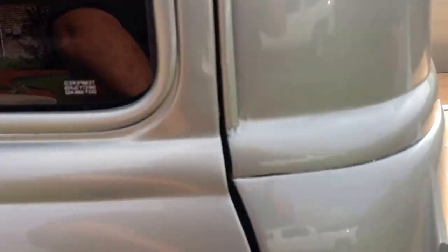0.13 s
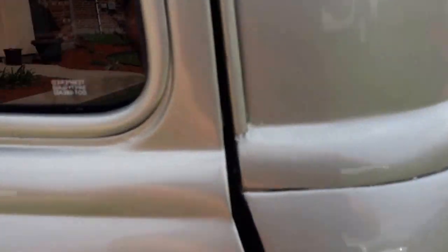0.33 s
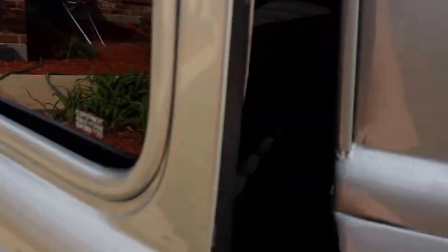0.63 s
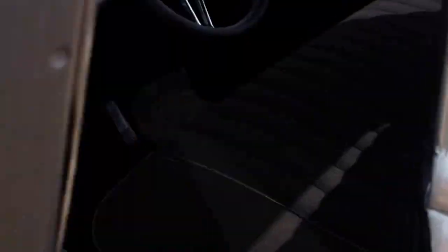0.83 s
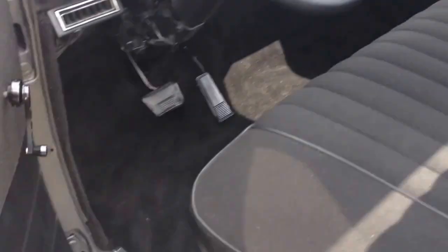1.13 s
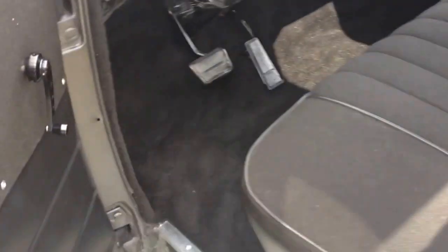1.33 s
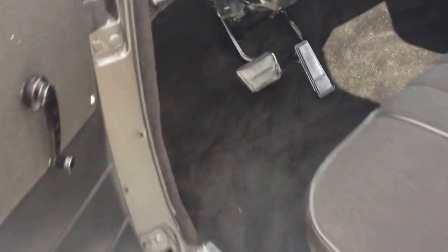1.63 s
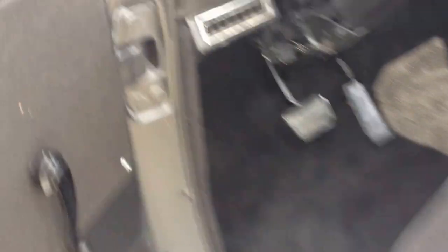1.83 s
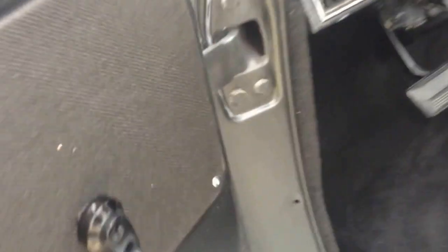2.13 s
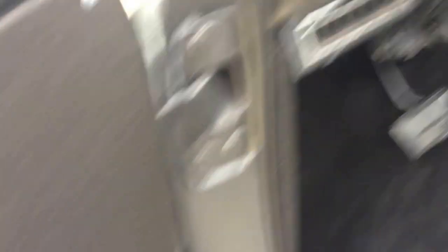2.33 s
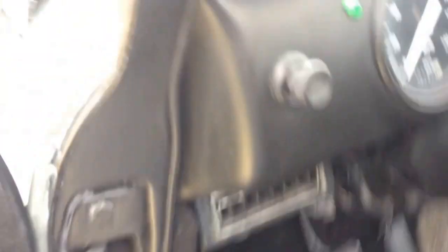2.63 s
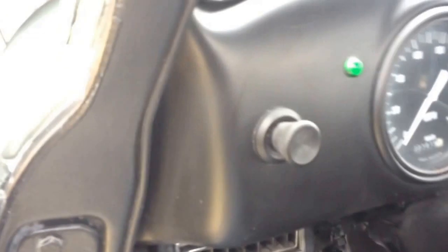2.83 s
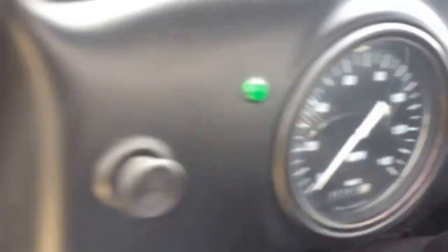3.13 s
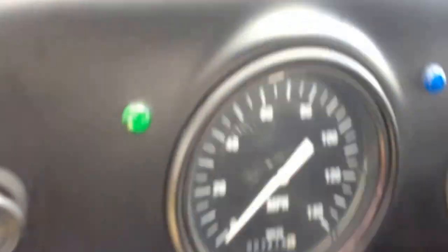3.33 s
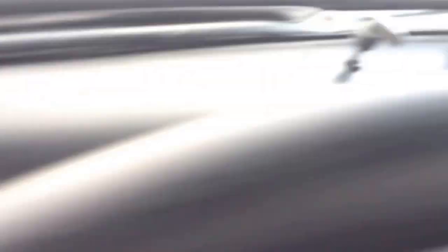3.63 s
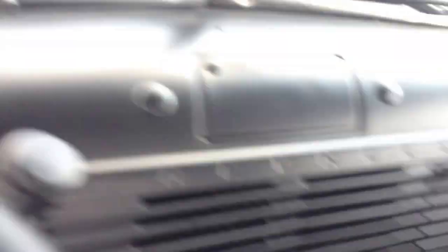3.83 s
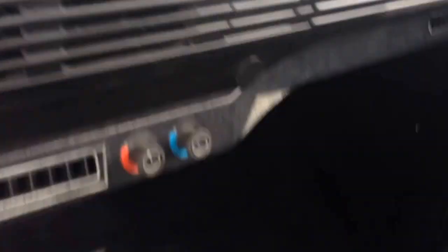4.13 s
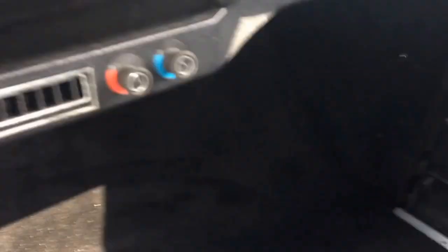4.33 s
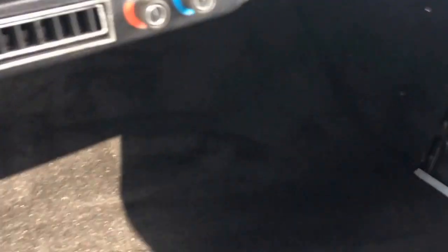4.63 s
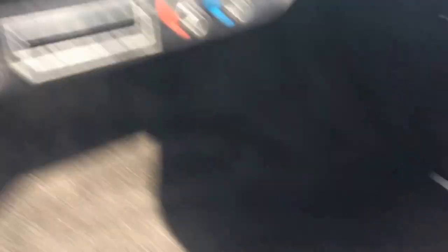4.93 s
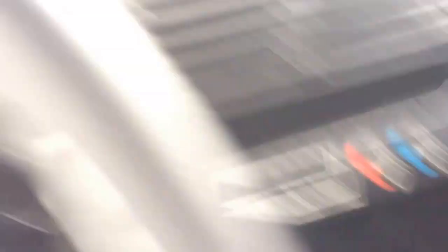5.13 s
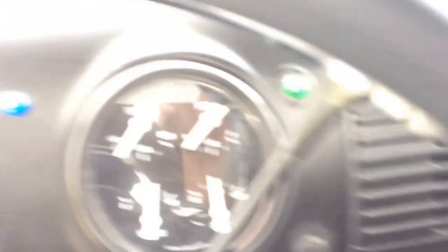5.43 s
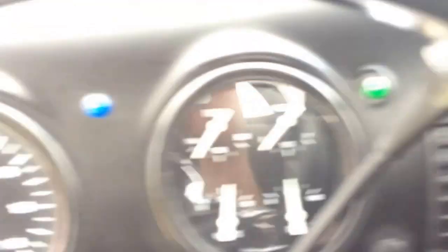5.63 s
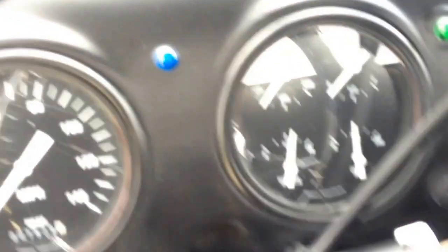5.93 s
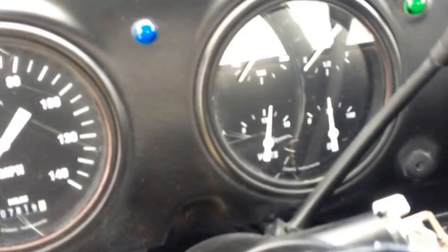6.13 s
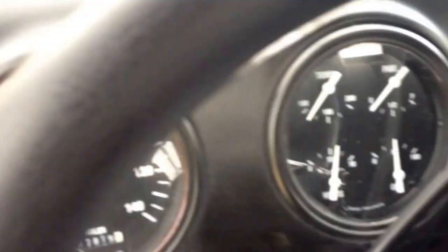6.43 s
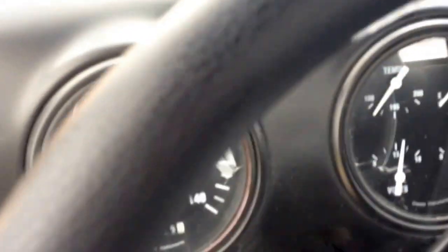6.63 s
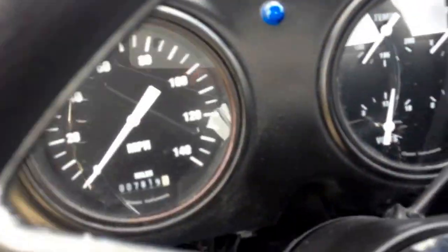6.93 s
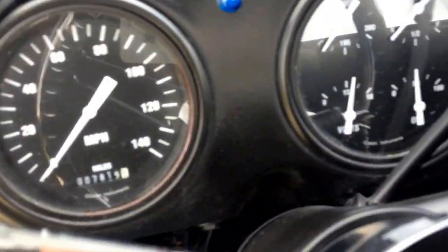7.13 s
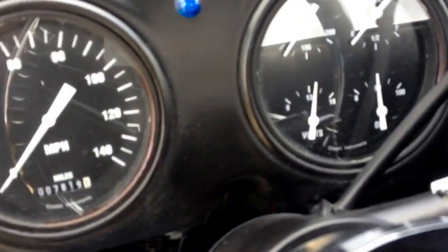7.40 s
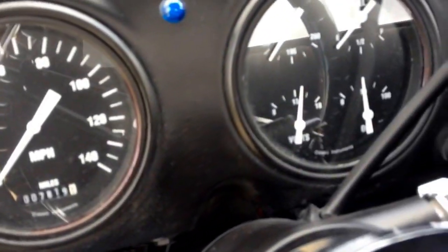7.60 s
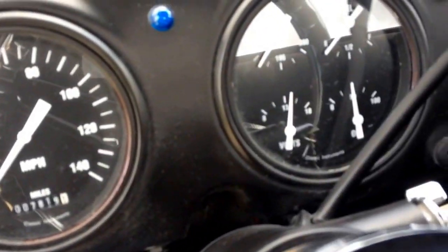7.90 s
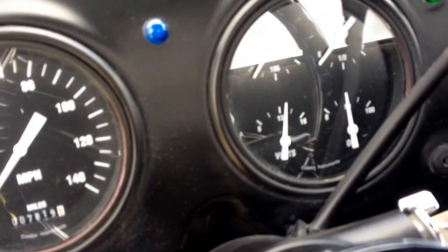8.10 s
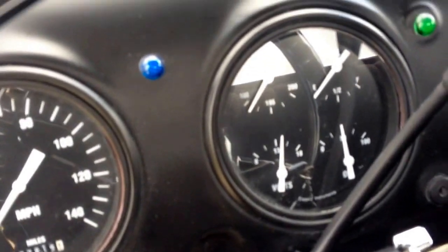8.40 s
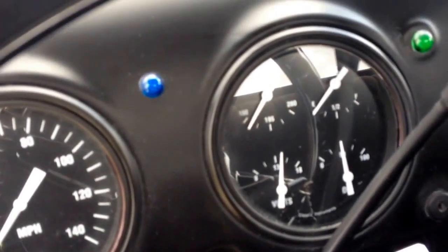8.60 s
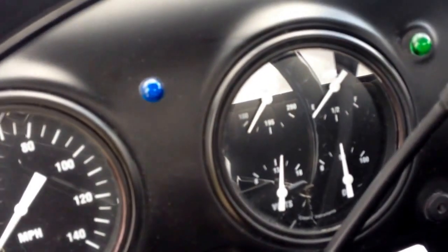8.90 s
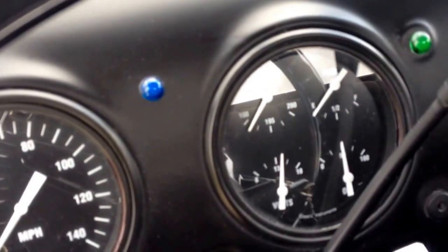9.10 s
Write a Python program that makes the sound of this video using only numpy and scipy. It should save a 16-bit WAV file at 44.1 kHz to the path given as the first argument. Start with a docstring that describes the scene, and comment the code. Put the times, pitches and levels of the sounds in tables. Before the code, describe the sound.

An old pickup's V8 idles throughout, about 54 uneven firings a second, throbbing with a slow lope over low rumble. Valve ticks, clatter near 1 kHz, fan rush, hiss and a faint wavering whine come from the engine bay. From 0.13 to 0.34 s the door latch drags, slips and lets go in a dense cluster of knocks, loudest and sharpest around 0.27 s. Softer, dull door bumps follow at 0.77, 1.26 and 1.44 s. Bay noise is most open near 1.8 s, then recedes as the microphone enters the cab; the exhaust resonance thins under the dash around 4 to 5 s, then returns. A hard double clack with bounces comes at 3.2 s, faint ticks at 3.7-4.3 and 5.5-6.0 s. Steady idle holds until 7.9 s, when revs climb, bark near 8.5 s, and surge after 9 s with one hard knock, ending high at about 9.3 s.

```python
"""First heard is the uneven idle of an old pickup's V8: eight exhaust pulses a cycle ring pipes and cab.
Valve gear ticks and clatters in step from the engine bay, over a rush, a hiss and a faint, varying whine.
The latch drags, slips and thumps as the door opens; the microphone goes round it into the cab.
There, struck modes give a sharp clack and small ticks. At the end the engine is revved:
its firing rate climbs, cab modes and higher engine orders sing out, and a low rumble lies under all."""
import sys
import numpy as np
from scipy import signal
from scipy.fft import rfft, irfft, next_fast_len
from scipy.io import wavfile
from scipy.ndimage import uniform_filter1d, map_coordinates

SR = 44100
rng = np.random.default_rng(int(sys.argv[2]) if len(sys.argv) > 2 else 0)


def wrap_up_sound(samples):
    """Save the sound to the file named by the first command line argument, as 16-bit audio."""
    columns = np.atleast_2d(samples).T
    # keep every value between -1 and 1, then stretch to whole-number steps
    tamed = np.clip(columns, -1, 1)
    steps = np.round(tamed * 32767).astype(np.int16)
    wavfile.write(sys.argv[1], SR, steps)


N = 408366
TIME = np.arange(N) / SR  # [s]

# Engine speed, a wandering idle and then the rev. Each row: time in [s], firing rate in [firings per s].
SPEED = [(0.0, 53.87), (0.8, 53.98), (1.2, 55.12), (1.6, 54.26), (2.8, 54.36), (3.2, 53.44), (4.4, 54.29),
         (4.8, 53.74), (5.6, 54.5), (6.0, 52.96), (6.4, 54.05), (7.2, 54.52), (7.93, 53.7), (8.3, 76.6),
         (8.5, 89.7), (8.65, 95.6), (8.88, 100.2), (9.0, 115.3), (9.1, 131), (9.17, 138.5), (9.26, 140)]
# The pedal eased down, blipped and let go. Each row: time in [s], throttle as a [share 0-1].
THROTTLE = [(7.9, 0), (8.25, 0.13), (8.55, 0.19), (8.7, 0.31), (8.87, 0.47), (9.02, 0.95), (9.14, 0.83),
            (9.26, 0.3)]
# How open the microphone lies to the engine bay, as it goes round the door into the cab.
# Each row: time in [s], openness as a [share 0-1].
OPENNESS = [(0.04, 0.83), (.55, 0.59), (1.05, 0.85), (1.75, 0.98), (2.6, 0.41), (3.2, 0.56), (4.0, 0.16),
            (7.9, 0.16)]
# Strength of the cab's standing waves at the microphone, weakest under the dash; layers take a share of it.
# Each row: time in [s], strength in [dB].
CAB_RING = [(.7, -1.5), (2.8, 2.5), (3.55, 1.5), (4.05, -11), (4.5, -13), (4.95, -11.5), (5.35, -4),
            (6.35, 0.5), (7.8, -1.5)]

# One engine cycle at the tailpipes. Each row: arrival in [firing intervals], relative strength in [dB].
CYLINDERS = [(-0.13, -3), (0.68, 0.6), (1.73, -2.4), (2.84, -0.4), (3.66, 2.4), (4.85, 0.2), (5.94, -1.6),
             (6.72, 2)]
# Resonances of pipes and cab. Each row: frequency in [Hz], width in [Hz], relative level in [dB].
PIPE_RESONANCES = [(150.3, 13.6, 4.5), (189.4, 17, -1), (247.85, 15.3, 8.5), (282.6, 17, 5.5)]
# Upper pipe resonances. Each row: frequency in [Hz], width in [Hz], relative level in [dB].
UPPER_PIPE_RESONANCES = [(410.3, 11.4, 11), (471.2, 5.1, 11), (520.3, 26, 4.5)]
# Gas puffs in each cycle. Each row: place in [firing intervals], relative strength in [dB].
PUFFS = [(1.3, 2), (2.1, -4.5), (3.2, -6), (4.0, 0), (4.721, 1), (6.8, -6)]
# Engine orders that sing out in the rev. Each row: [multiple of the firing rate], relative level in [dB].
REV_ORDERS = [(2.375, -2), (2.75, 0), (3.625, -3), (4.25, -4), (4.75, -6), (5.75, -9)]
# Colour of the gas rasp. Each row: frequency in [Hz], relative density in [dB per Hz].
RASP_COLOUR = [(280, -7.5), (340, -6.5), (400, 4.5), (430, -14), (480, -1), (535, -9.5), (600, -43),
               (680, -28), (740, -9.5), (880, -38), (1200, -31.5)]
# The cab booms when the firing rate crosses its lowest mode
BOOM_HZ, BOOM_WIDTH_HZ = 64.8, 4.55
# The pipes bark louder in a narrow range of speed (firings per s)
BARK_FIRING_HZ, BARK_WIDTH_HZ, BARK_SWELL_DB = 89, 5.2, 9.5
# The cab's two strongest modes
DRONE_HZ, DRONE_RING_WIDTH_HZ = 175.6, 47
BARK_HZ, BARK_RING_WIDTH_HZ = 266.3, 15
# The idle lopes, one heavy beat a cycle: its place in firing intervals, and the swing at idle
LOPE_PLACE, LOPE_DB = 4.9, 2.1

# Knocks in each engine cycle. Each row: place in [firing intervals], relative strength in [dB].
KNOCKS = [(1.65, -2), (2.3, -7.5), (3.7, -0.5)]
# The bay knock comes and goes. Each row: time in [s], level in [dB over the clatter, before its blurring].
KNOCK_LEVEL = [(1.95, 2), (2.4, -2), (3.1, -7), (4.0, -7), (4.45, 3), (5.2, 2), (5.7, -2), (7.0, 0.5)]
# Valve ticks in each cycle. Each row: place in [firing intervals], relative strength in [dB], ring in [Hz].
VALVES = [(.45, 0.5, 2420), (1.0, 5, 6970), (2.03, 3.5, 4550), (4.0, 2.5, 6230), (7.0, 2.5, 7850)]
# Resonances of the rocker covers. Each row: frequency in [Hz], width in [Hz], relative level in [dB].
ROCKER_RESONANCES = [(1876, 140, 4), (2290, 120, -5), (3010, 87, -2.5)]
# The rocker covers rattle in patches. Each row: time in [s], change of level in [dB].
ROCKER_LEVEL = [(1.5, 6), (1.88, 5), (2.15, -3), (5.4, -0.5), (5.9, 5), (6.6, 3), (7.0, -2)]
# The whine's course. Each row: time in [s], level in [dB, before a small trim and drift].
WHINE_LEVEL = [(1.3, -61), (1.8, -43), (2.05, -53), (2.5, -42), (2.7, -51), (3.6, -51), (3.85, -47),
               (4.25, -65), (4.55, -45.5), (7.2, -49), (8.4, -43)]
# Colour of the clatter. Each row: frequency in [Hz], relative density in [dB per Hz].
CLATTER_COLOUR = [(700, 1.5), (900, -2), (980, 3), (1040, 9.5), (1090, 5), (1170, 4), (1300, -7.5),
                  (1700, -16.5)]
# Colour of the fan's rush. Each row: frequency in [Hz], relative density in [dB per Hz].
RUSH_COLOUR = [(700, 7.5), (1250, 3), (1450, 6.5), (1650, 2), (1950, 4), (2500, 1), (3400, -3.5),
               (4850, -4), (5200, -15.5), (8000, -40)]
# Colour of bay and intake hiss. Each row: frequency in [Hz], relative density in [dB per Hz].
HISS_COLOUR = [(3500, 4), (5100, 1), (5600, 1.5), (7000, 0), (8500, -2), (9900, -1), (11500, -1.5),
               (13000, -2), (15500, -5.5)]
# Colour of the valve ticks. Each row: frequency in [Hz], relative density in [dB per Hz].
TICK_COLOUR = [(1500, -21), (4700, -2.5), (8500, -8.5), (12000, 0), (15500, -6.5)]
# One hard knock in the rev, and what it rings. Each row: frequency in [Hz], relative level in [dB], t60 in [s].
COVER_MODES = [(1005, -3, .05), (1070, 4, 0.071)]
HARD_KNOCK_S, HARD_KNOCK_DB = 9.064, -14.5

# Slips and blows on latch and door. Each row: time in [s], peak in [dB], brightness (low-pass) in [Hz].
DOOR_BLOWS = [(0.126, -11, 550), (0.154, -18, 700), (0.172, -11, 900), (0.189, -15, 1390), (0.2, -7.5, 700),
              (0.212, -10, 1000), (0.226, -17, 500), (0.2395, -3.5, 1250), (0.255, -10, 2000),
              (0.264, -9, 1800), (0.2696, 0.5, 4600), (0.2719, -1.5, 330), (.279, -5, 3000),
              (0.2817, -6, 5000), (0.2882, -4, 2800), (0.304, -19, 1600), (0.336, -11, 1500),
              (0.764, -20, 600), (0.784, -17, 1000), (1.238, -19, 700), (1.254, -13.5, 900),
              (1.258, -13.5, 1100), (1.265, -14, 1500), (1.269, -4.5, 550), (1.426, -17, 800),
              (1.442, -13, 650), (1.458, -19, 1200)]
# Modes of the door panel. Each row: frequency in [Hz], relative level in [dB], t60 in [s].
DOOR_MODES = [(165, 3, 0.064), (246, 3.5, 0.044), (345, 0.5, 0.034), (534, 2.5, 0.023), (710, -6, 0.042),
              (1045, -2.5, 0.02), (1280, -12, 0.06), (1540, -13, 0.038), (1780, -12, 0.033),
              (2180, 1.5, 0.0072), (2680, -8, 0.013), (3400, -6, 0.0039)]
# The latch drags until it lets go, later the door scuffs as it swings.
# Each row: start in [s], end in [s], level at the end in [dB].
DRAGS = [(0.126, 0.268, -20.5), (0.743, 0.797, -37), (1.233, 1.279, -35), (1.402, 1.457, -37)]
DRAG_RISE_DB_PER_S, DRAG_FALL_DB_PER_S = 75, 330

# The clack, two strikes with bounces between. Each row: time in [s], peak in [dB], ping raised by [dB].
CLACKS = [(3.205, -14.5, 4), (3.209, -13.5, -6), (3.219, -20, -20), (3.226, -17.5, -20), (3.2335, -11, -2)]
# What the clack rings. Each row: frequency in [Hz], relative level in [dB], t60 in [s].
CLACK_MODES = [(400, -8, 0.15), (620, -14, 0.12), (810, -6, 0.11), (1270, -18, 0.072), (2044, 2, 0.062),
               (2310, -1.5, 0.034), (2590, -5, 0.074), (3490, 1, 0.029), (4600, 0, 0.02), (3930, -3, 0.037)]
# Its high ping. Each row: frequency in [Hz], level in [dB, before each strike's change], t60 in [s].
PING_MODES = [(9600, -6, .03), (9800, 10.5, 0.028), (13200, 7, .06)]
# A loose part ticks in short runs. Each row: time in [s], peak in [dB], brightness (low-pass) in [Hz].
RATTLES = [(3.705, -26.5, 2620), (3.7902, -26.5, 7000), (3.868, -28, 6000), (4.1439, -29, 2500),
           (4.2347, -26.5, 7000), (4.252, -27, 5000), (4.312, -30.5, 7000), (5.51, -31.5, 6000),
           (5.778, -25, 2000), (5.8637, -26, 5000), (5.9402, -30, 8000), (5.994, -28.5, 6030),
           (6.017, -27.5, 7000)]
# Ring of the loose part. Each row: frequency in [Hz], relative level in [dB], t60 in [s].
RATTLE_MODES = [(1343, -2, 0.086), (2050, 0, .06), (2830, -1.8, 0.054), (4760, 0, .04), (7480, -1, 0.06),
                (10600, -1, .06), (12550, 2, .05), (13600, 1, .05)]

# Colour of the low rumble. Each row: frequency in [Hz], relative density in [dB per Hz].
RUMBLE_COLOUR = [(20, -24), (40, -13), (100, -0.5), (220, 6), (400, -3), (900, -45)]
CUTOFF_HZ = 15500


def exhaust(firings, per_s, effort):
    """Pulses ring the pipes; their uneven pattern gives a lope at idle and a fan of climbing lines in the rev."""
    pulses = cycle_clicks(firings, CYLINDERS, spread_db=.6, jitter=.004)
    # turbulent gas trails every pulse, more so at speed
    pulses = pulses + swell(pulses, rise_s=.004) * noise() * (.003 + .012 * effort)
    # at speed the climbing orders ring the cab's modes one after another
    sung = np.interp(effort, [.05, .3], [0, .95])
    drone, bark = drone_and_bark(pulses, sung)
    bark = bark * from_db(BARK_SWELL_DB * np.exp(-((per_s - BARK_FIRING_HZ) / BARK_WIDTH_HZ) ** 2))
    lope_db = LOPE_DB * (1 - sung) * np.cos(2 * np.pi * (firings - LOPE_PLACE) / 8)
    bark = bark * from_db(lope_db + .9 * drift(12))
    boom = np.sin(2 * np.pi * firings) * from_db(0.87 * drift(10))
    boom = boom / np.hypot(1, 2 * (per_s - BOOM_HZ) / BOOM_WIDTH_HZ)
    rasp = gas_rasp(firings, effort)
    climbing = rev_orders(firings)
    return (climbing * level(effort, idle_db=-55, speed_db=28, throttle_db=12)
            + boom * level(effort, idle_db=-24.0, open_db=-12.0, ring=-.08, throttle_db=-2)
            + drone * level(effort, idle_db=-28, ring=0.63, speed_db=9.5, throttle_db=13)
            + bark * level(effort, idle_db=-23.5, ring=1, speed_db=-4.0, throttle_db=18)
            + rasp * level(effort, idle_db=-37.0, open_db=-4, ring=0.34, speed_db=13.0, throttle_db=4.5))


def drone_and_bark(pulses, sung):
    """Pipe resonances split at 222 Hz, as the two parts fade differently; in the rev each rings a cab mode."""
    pipes = cut(resonances(pulses, PIPE_RESONANCES), 95, "high", order=4)
    drone, bark = pipes, pipes
    for _ in range(2):
        drone = cut(drone, 222, "low", order=4)
        bark = cut(bark, 222, "high", order=4)
    bark = evened(cut(bark, 363, "low", order=3))
    bark_ring = evened(resonate(bark, BARK_HZ, BARK_RING_WIDTH_HZ))
    bark = evened((1 - sung) * bark + sung * bark_ring)
    drone_ring = resonate(drone, DRONE_HZ, DRONE_RING_WIDTH_HZ)
    drone_ring = evened(resonate(drone_ring, DRONE_HZ, DRONE_RING_WIDTH_HZ))
    drone = evened((1 - sung) * evened(drone) + sung * drone_ring)
    return drone, bark


def gas_rasp(firings, effort):
    """Bursts of gas puff and ring the upper pipe resonances; at speed the ringing takes over."""
    bursts = cycle_clicks(firings, PUFFS, spread_db=1.5, jitter=.004)
    upper = cut(resonances(bursts, UPPER_PIPE_RESONANCES), [330, 620], "band", order=3)
    puffs = .25 + swell(bursts, rise_s=.005)
    ringing = 1.2 + 1.2 * effort
    return evened(ringing * evened(upper) + colour(noise() * puffs, RASP_COLOUR))


def rev_orders(firings):
    """Sines locked to multiples of the firing rate climb with the engine, each drifting in level."""
    orders = [from_db(db + 2 * drift(12)) * np.sin(2 * np.pi * multiple * firings)
              for multiple, db in REV_ORDERS]
    return rms_one(sum(orders))


def engine_bay(firings, effort):
    """Knocks ring a cover near 1 kHz, valves tick over the fan's rush, and an accessory whines."""
    openness, throttle = in_time(OPENNESS), in_time(THROTTLE)
    # knocks and ticks stand out most outside the cab and blur at speed
    distinct = 0.46 + 0.68 * openness - 0.93 * effort
    clatter = knocking_clatter(firings, distinct)
    hard_knock = np.zeros(N)
    add(hard_knock, blow(COVER_MODES, crack=0.28, crack_s=.004, tail=.2, tail_s=.012), HARD_KNOCK_S, HARD_KNOCK_DB)
    ticks, tick_sound = valves(firings)
    rush = colour(noise() * (1 + 0.52 * distinct * ticks), RUSH_COLOUR)
    rush = evened(reflections(rush, strength=0.13))
    rockers = evened(resonances(tick_sound, ROCKER_RESONANCES, alternate=False))
    rockers = rockers * from_db(in_time(ROCKER_LEVEL))
    hiss = evened(colour(noise(), HISS_COLOUR) + 0.78 * distinct * colour(tick_sound, TICK_COLOUR))
    # the cube leaves little intake hiss until the throttle is wide open
    intake = from_db(-36.5) * np.clip(throttle, 0, 1) ** 3 * colour(noise(), HISS_COLOUR)
    return (clatter * level(effort, idle_db=-44.5, open_db=3.0, speed_db=5, throttle_db=11.0)
            + rush * level(effort, idle_db=-45.5, open_db=6.5, ring=0.16, speed_db=6, throttle_db=8.0)
            + rockers * level(effort, idle_db=-60.5, open_db=5.0)
            + hiss * level(effort, idle_db=-52.0, open_db=11.0, ring=0.26, speed_db=-5.0)
            + hard_knock + intake + accessory_whine(effort))


def knocking_clatter(firings, distinct):
    """Broad clatter swells a little with each knock, and a drifting tone near 1 kHz rings as the cover."""
    knocks = swell(cycle_clicks(firings, KNOCKS, spread_db=3, jitter=0.04), rise_s=0.0055)
    cover = tone(1035 + 30 * drift(45)) * evened(knocks)
    clatter = evened(colour(noise() * (14.0 + knocks), CLATTER_COLOUR))
    return clatter + from_db(in_time(KNOCK_LEVEL)) * distinct * cover


def valves(firings):
    """Every valve gives a gritty tick with a ring of its own; returns the ticks' envelope and their sound."""
    envelope, sound = 0, 0
    for place, db, hz in VALVES:
        ticks = swell(cycle_clicks(firings, [(place, db)], spread_db=2.1, jitter=.04), rise_s=.003)
        gritty = noise() * ticks
        envelope = envelope + ticks
        sound = sound + gritty + 3.2 * resonate(gritty, hz, 600)
    return envelope, sound


def accessory_whine(effort):
    """A sine near 785 Hz rises slightly with engine speed and drifts in pitch and level."""
    whine = np.sqrt(2) * tone(785 + 16 * effort + 8 * drift(25))
    return whine * from_db(in_time(WHINE_LEVEL) - .7 + 3 * drift(18))


def door():
    """Latch and door drag ever harder, slip and let go, shaking the panel; soft contacts are duller."""
    drag = 0
    for start, end, db in DRAGS:  # the rise is set by the end alone
        before, after = np.maximum(end - TIME, 0), np.maximum(TIME - end, 0)
        drag = drag + from_db(db - DRAG_RISE_DB_PER_S * before - DRAG_FALL_DB_PER_S * after)
    scrape = cut(cut(grit(N, spread_db=5.5), [150, 700], "band"), 900, "low")
    out = drag * rms_one(scrape)
    for s, peak_db, bright_hz in DOOR_BLOWS:
        add(out, door_blow(bright_hz), s, peak_db)
    return out


def door_blow(bright_hz):
    """One contact on the door's modes, dulled above its brightness."""
    hit = blow(DOOR_MODES, crack=0.098, crack_s=0.0098, tail=0.93, tail_s=0.024)
    return cut(cut(hit, bright_hz, "low", order=3), 118, "high", order=4)


def clacks():
    """Small hard parts knock together in the cab: a double clack with bounces, then lighter ticks."""
    out = np.zeros(N)
    for s, peak_db, ping_db in CLACKS:
        modes = CLACK_MODES + [(hz, db + ping_db, t60) for hz, db, t60 in PING_MODES]
        strike = blow(modes, crack=2.5, crack_s=0.0093, tail=3.9, tail_s=0.046)
        add(out, cut(strike, 3500, "low", order=1), s, peak_db)
    for s, peak_db, bright_hz in RATTLES:
        tick = blow(RATTLE_MODES, crack=3.0, crack_s=0.018, tail=8.0, tail_s=0.037)
        add(out, cut(tick, bright_hz, "low", order=1), s, peak_db)
    return out


def low_rumble(effort):
    """Coloured noise lies under all, louder toward the bay, with speed and with throttle."""
    gain = level(effort, idle_db=-38.5, open_db=6.5, speed_db=7, throttle_db=8.5)
    return gain * colour(noise(), RUMBLE_COLOUR)


def level(effort, idle_db, open_db=0, ring=0, speed_db=0, throttle_db=0):
    """Gain of a layer: its idle level, moved by the microphone's place, the engine's speed and the throttle."""
    place_db = open_db * in_time(OPENNESS) + ring * in_time(CAB_RING)
    return from_db(idle_db + place_db + speed_db * effort + throttle_db * in_time(THROTTLE))


def cycle_clicks(firings, pattern, spread_db, jitter):
    """Repeat a pattern every eight firings, each click a little off in strength and time."""
    place, db = np.transpose(pattern)
    starts = 8 * np.arange(80)[:, None]
    shift, strong = rng.standard_normal((2, len(starts), len(place)))
    at = np.searchsorted(firings, starts + place + jitter * shift)
    heard = (at > 0) & (at < N)
    return np.bincount(at[heard], from_db(db + spread_db * strong)[heard], N)


def swell(clicks, rise_s):
    """Each click of strength 1 becomes a quick swell of height 1 with a slower fall."""
    r = np.exp(-1 / (rise_s * SR))
    return signal.lfilter([np.e / (rise_s * SR)], [1, -2 * r, r * r], clicks + 1e-18)


def blow(modes, crack, crack_s, tail, tail_s):
    """One contact: a gritty crack, every mode with a strength of its own, and a dull tail from the cab."""
    t = TIME[:SR // 4]
    hz, db, t60 = np.transpose(modes)[:, :, None]
    strength = from_db(db + 2 * rng.standard_normal(hz.shape)) * rng.choice([-1, 1], hz.shape)
    rings = strength * np.sin(2 * np.pi * hz * t) * np.exp(-np.log(1000) * t / t60)
    grains = grit(len(t), spread_db=-2.0) * np.exp(-t / crack_s)
    wash = cut(rng.standard_normal(len(t)), [250, 1100], "band") * np.exp(-t / tail_s)
    return rings.sum(0) + crack * grains + tail * wash


def grit(size, spread_db):
    """Noise that comes in grains of very uneven strength, each about half a millisecond long."""
    sample = np.arange(size)
    grains = sample[::SR // 2000]
    strength_db = spread_db * np.clip(rng.standard_normal(len(grains)), -2, 2)
    return rms_one(rng.standard_normal(size) * from_db(np.interp(sample, grains, strength_db)))


def reflections(x, strength):
    """Close metal panels add short echoes, 1 to 12 ms late, that ripple the spectrum."""
    lags = (rng.uniform(.001, .012, size=8) * SR).astype(int)
    echoes = sum((-1) ** k * np.pad(x, (lag, 0))[:N] for k, lag in enumerate(lags))
    return x + strength * echoes


def resonate(x, hz, width_hz):
    """Two-pole resonance with gain 1 on top."""
    r = np.exp(-np.pi * width_hz / SR)
    numerator = np.array([1, 0, -1]) * (1 - r * r) / 2
    return signal.lfilter(numerator, [1, -2 * r * np.cos(2 * np.pi * hz / SR), r * r], x + 1e-18)


def resonances(x, rows, alternate=True):
    """Resonances side by side, by default with alternating polarity."""
    sign = -1 if alternate else 1
    return sum(sign ** k * from_db(db) * resonate(x, hz, width) for k, (hz, width, db) in enumerate(rows))


def tone(hz):
    """Sine that follows a moving frequency."""
    return np.sin(2 * np.pi * np.cumsum(hz) / SR)


def colour(x, spectrum):
    """Give x a spectrum, falling off beyond its ends; rms 1."""
    hz, db = np.transpose(spectrum)
    size = next_fast_len(N + 4096)
    bins = np.maximum(np.arange(size // 2 + 1) * SR / size, 1)
    gain = from_db(np.interp(np.log(bins), np.log(hz), db))
    gain = gain / (1 + (bins / hz[-1] / 2) ** 2) / (1 + (hz[0] / bins / 2) ** 2)
    return rms_one(irfft(rfft(x, size) * gain, size)[:N])


def cut(x, hz, kind, order=2):
    """Butterworth filter."""
    sos = signal.butter(order, np.clip(hz, 10, .45 * SR), kind, fs=SR, output="sos")
    return signal.sosfilt(sos, x + 1e-18)


def evened(x):
    """Level 1 over about two idle cycles; the throb within them stays."""
    size = round(.295 * SR)
    return x / np.sqrt(uniform_filter1d(x ** 2, size) + 1e-12)


def drift(per_s):
    """Smooth chance with spread 1, from random knots at a rate per second."""
    knots = rng.standard_normal(2000)
    return rms_one(map_coordinates(knots, [TIME * per_s], order=3, mode="wrap"))


def noise():
    """White noise."""
    return rng.standard_normal(N)


def add(out, sound, s, peak_db):
    """Mix a sound in at a time and peak level."""
    at = round(s * SR)
    out[at:at + len(sound)] += (from_db(peak_db) * sound / np.abs(sound).max())[:N - at]


def in_time(rows):
    """A curve's value, sample by sample."""
    s, value = np.transpose(rows)
    return np.interp(TIME, s, value)


def from_db(db):
    """Decibels to gain."""
    return 10 ** (np.asarray(db) / 20)


def rms_one(x):
    """Scale to rms 1."""
    return x / np.sqrt(np.mean(x ** 2) + 1e-20)


def scene():
    """Engine speed drives exhaust, bay and rumble; door and clacks keep their own times."""
    per_s = in_time(SPEED)
    firings = np.cumsum(per_s) / SR
    # 0 at the starting idle speed, growing with the log of speed
    effort = np.clip(0.74 * np.log(per_s / per_s[0]), 0, 1)
    engine = exhaust(firings, per_s, effort) + engine_bay(firings, effort)
    return (engine + door() + clacks() + low_rumble(effort))[None]


def record(dry):
    """Peaks flatten at full scale and a steep filter cuts the top."""
    low_pass = signal.ellip(10, .1, 80, CUTOFF_HZ, fs=SR, output="sos")
    return signal.sosfilt(low_pass, np.clip(dry, -1, 1))


dry = scene()
out = record(dry)
wrap_up_sound(out)
```